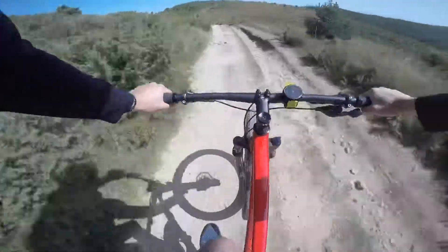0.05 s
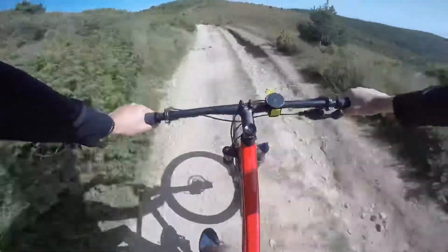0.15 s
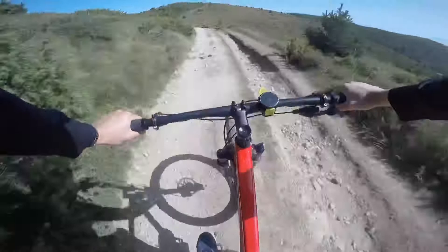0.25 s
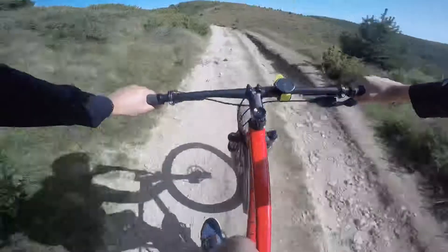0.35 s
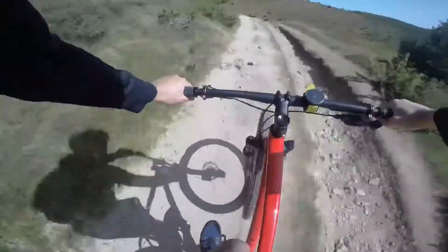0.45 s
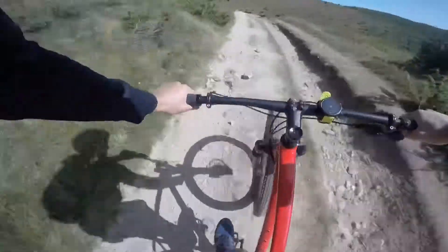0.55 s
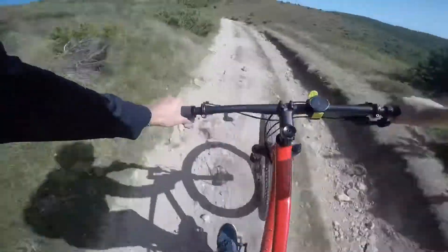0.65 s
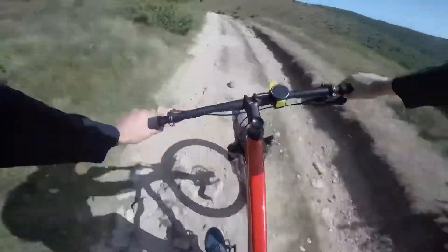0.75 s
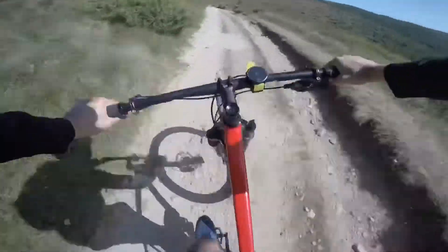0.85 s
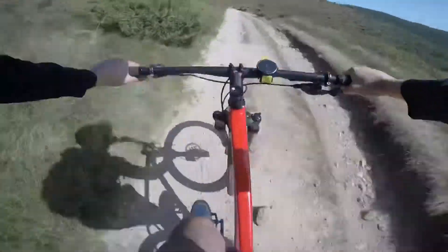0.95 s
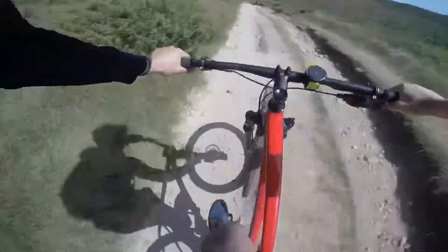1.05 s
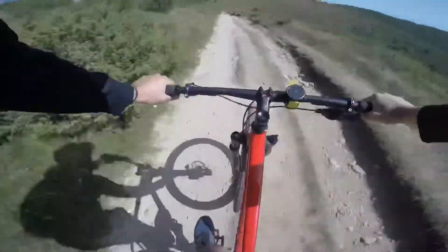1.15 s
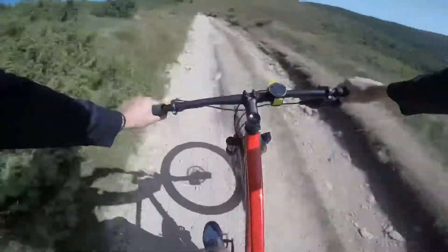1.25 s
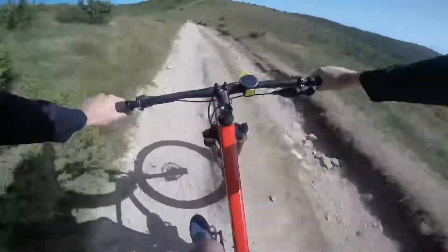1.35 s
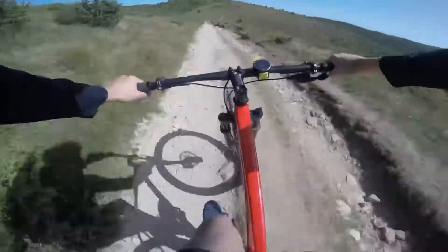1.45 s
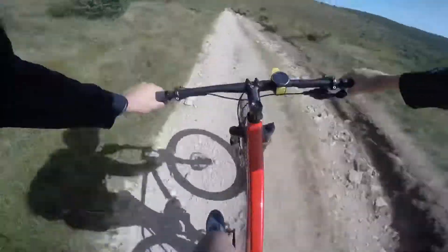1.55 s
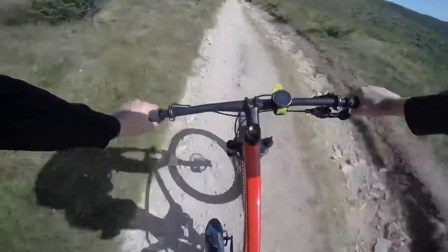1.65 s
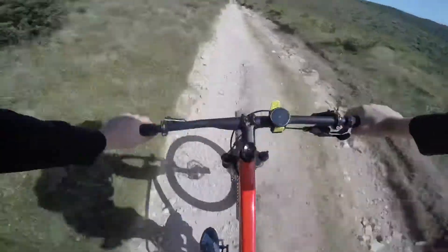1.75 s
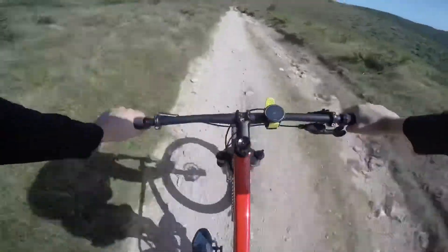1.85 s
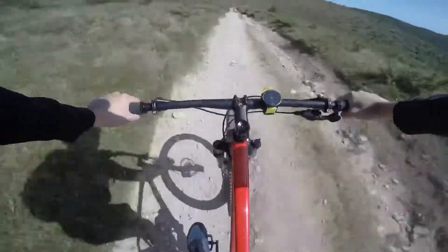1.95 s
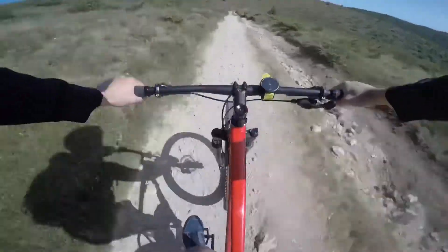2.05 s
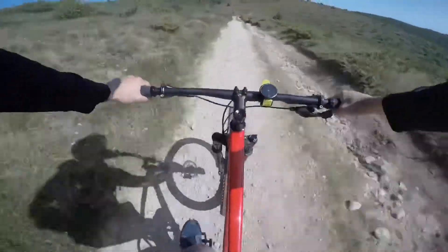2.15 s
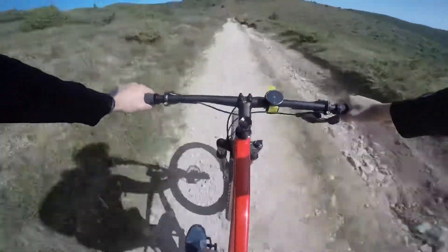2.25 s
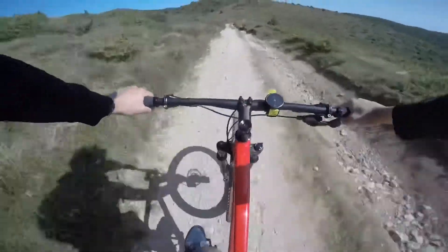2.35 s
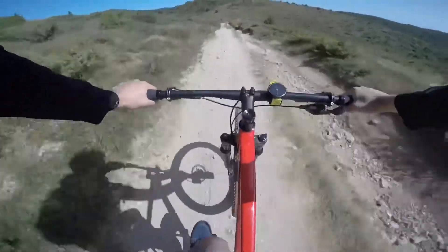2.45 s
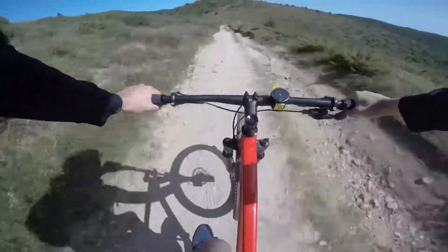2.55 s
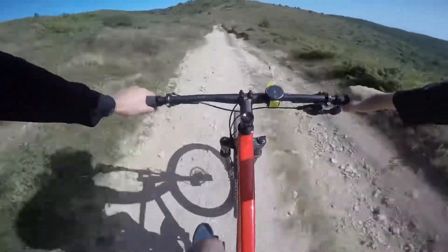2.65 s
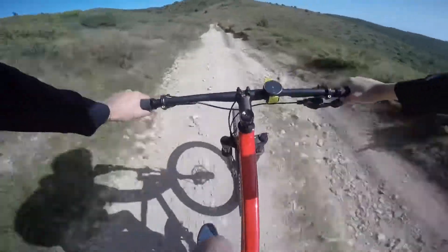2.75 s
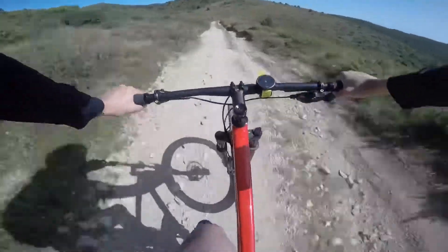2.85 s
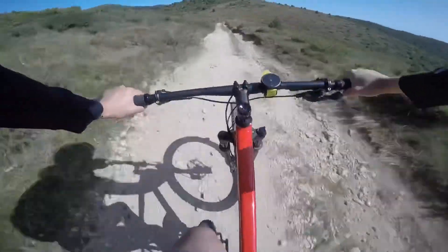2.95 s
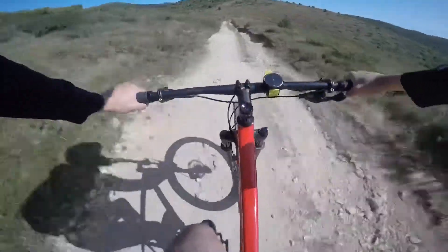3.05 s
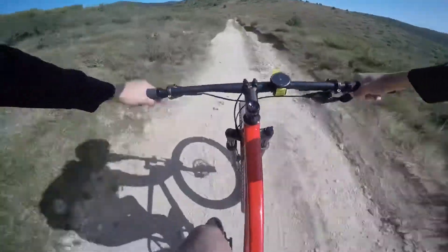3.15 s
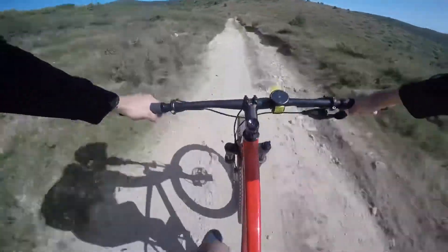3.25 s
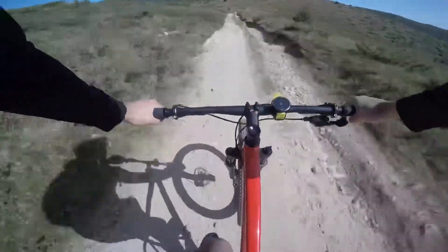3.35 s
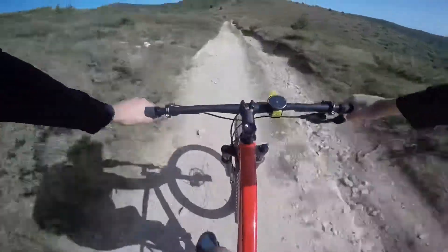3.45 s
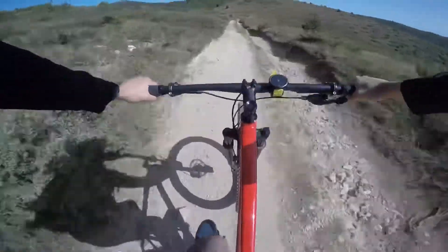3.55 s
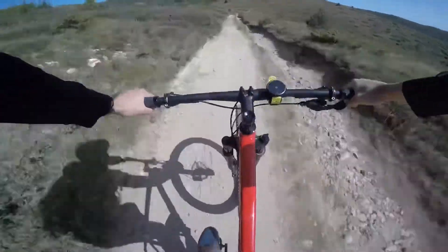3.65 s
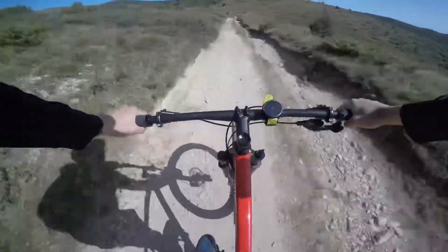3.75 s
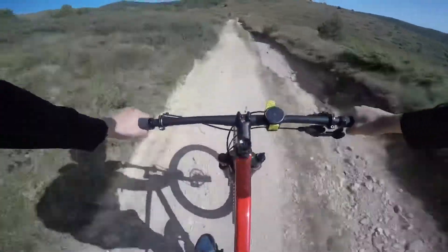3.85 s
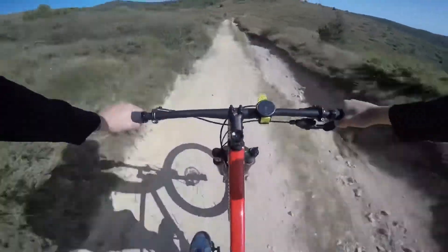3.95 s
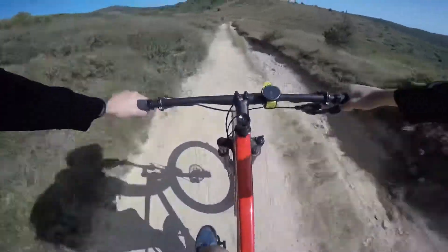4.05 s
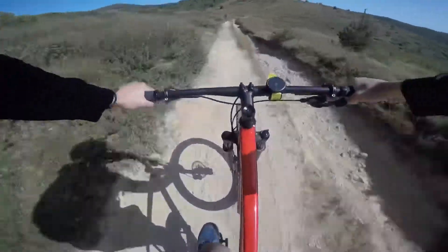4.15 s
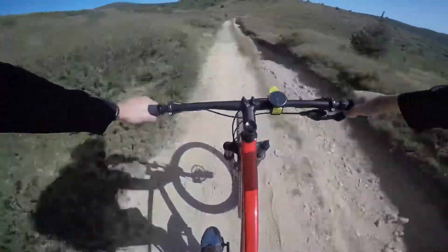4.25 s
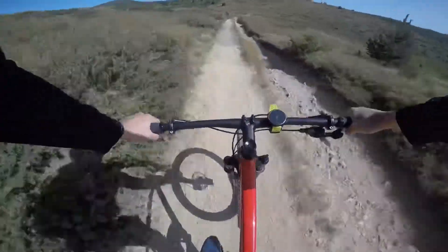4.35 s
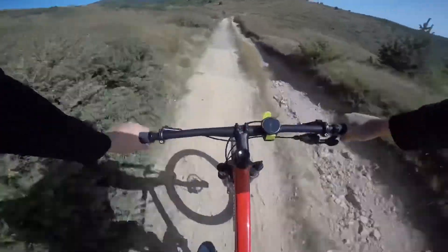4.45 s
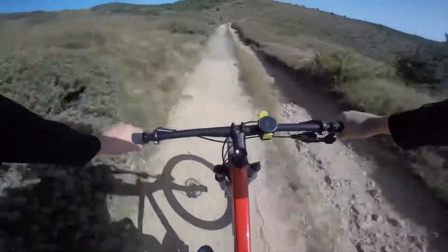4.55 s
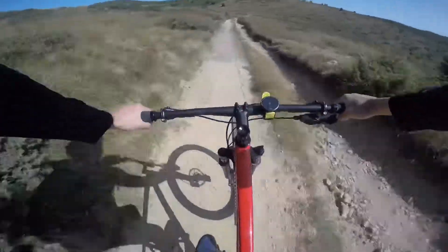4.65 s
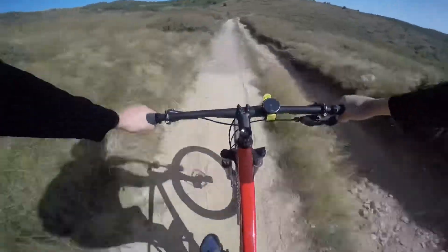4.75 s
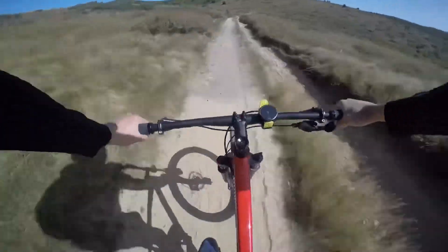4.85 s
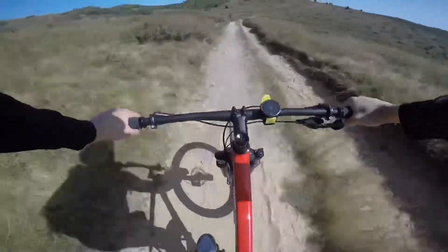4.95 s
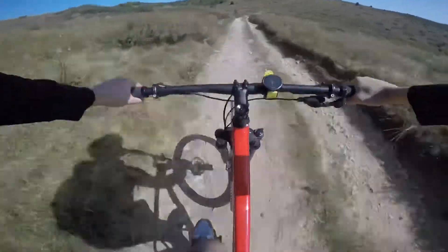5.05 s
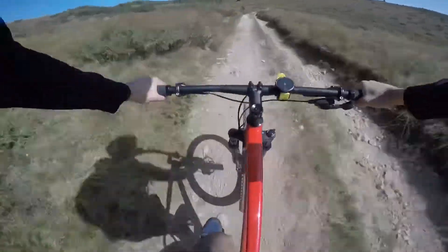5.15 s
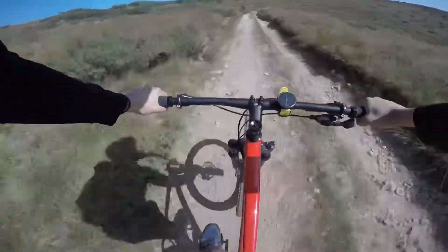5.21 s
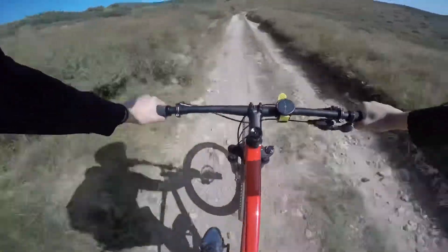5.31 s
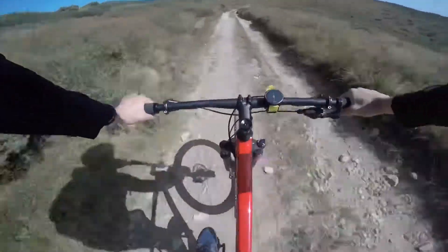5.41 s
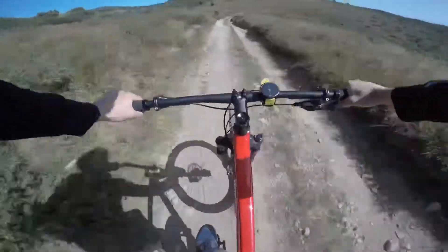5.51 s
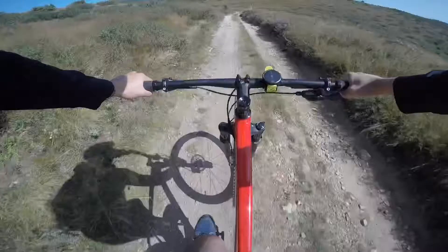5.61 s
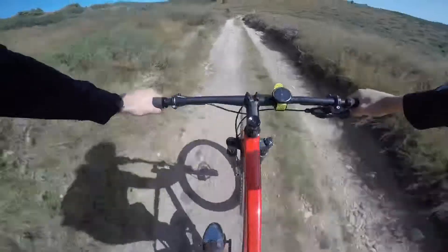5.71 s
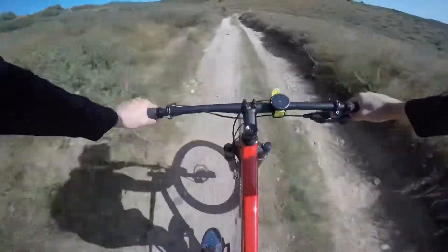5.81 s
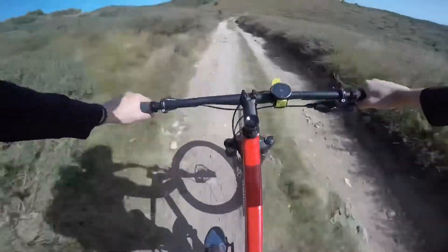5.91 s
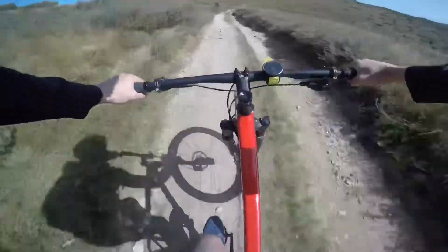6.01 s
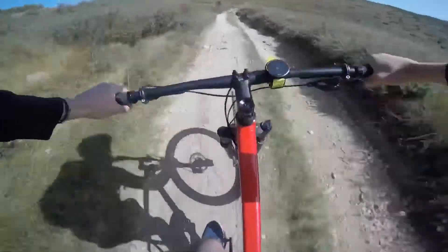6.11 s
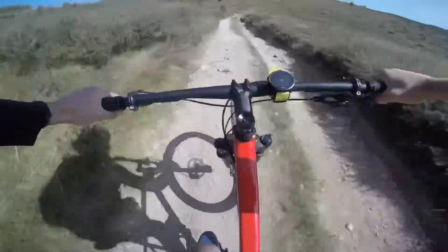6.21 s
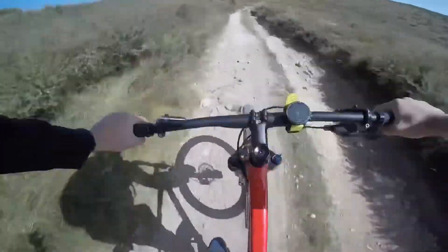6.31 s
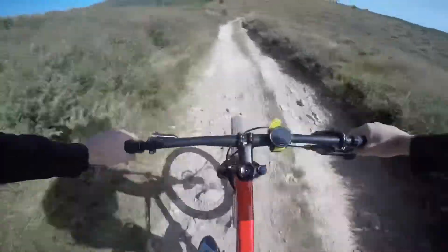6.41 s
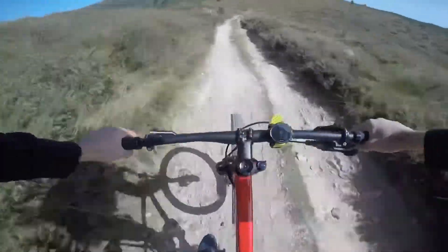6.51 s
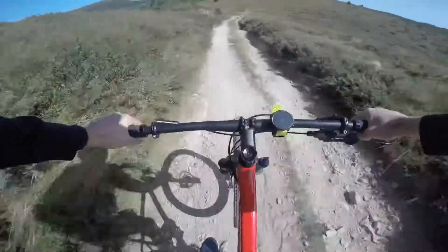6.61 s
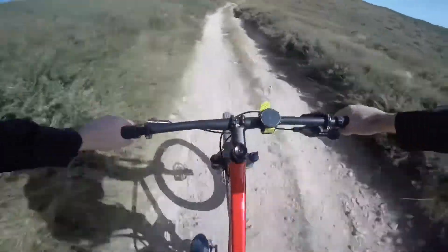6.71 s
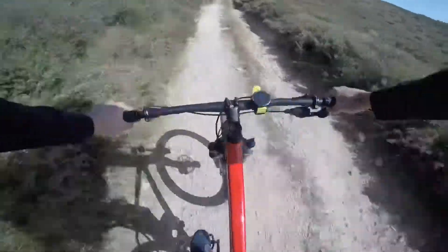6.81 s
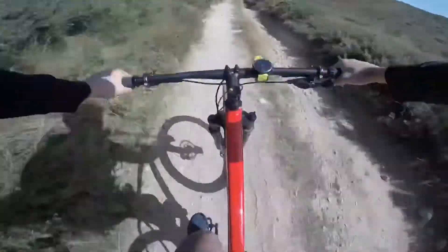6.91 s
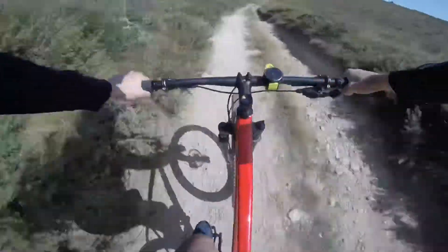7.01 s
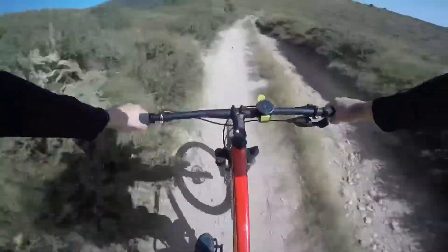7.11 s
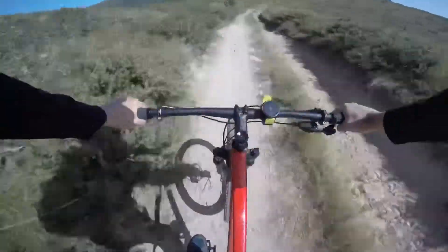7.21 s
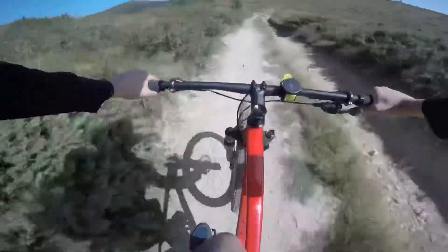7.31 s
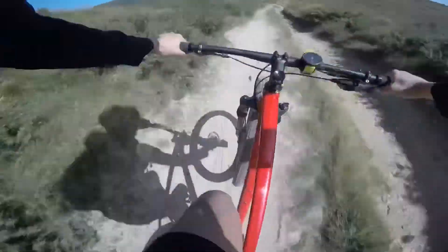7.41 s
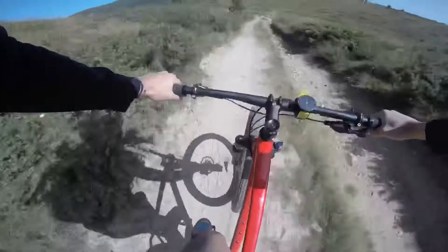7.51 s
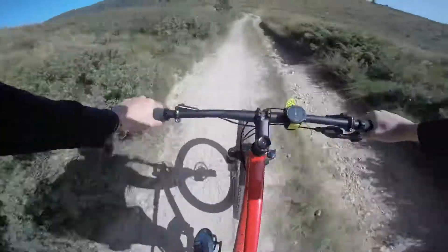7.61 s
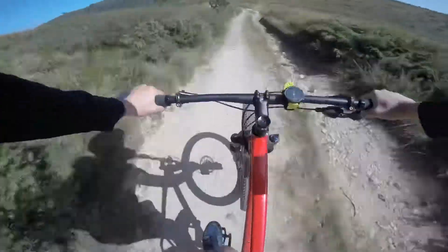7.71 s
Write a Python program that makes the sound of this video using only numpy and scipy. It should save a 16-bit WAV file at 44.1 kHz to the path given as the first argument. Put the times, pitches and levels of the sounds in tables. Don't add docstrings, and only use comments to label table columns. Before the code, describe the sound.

A mountain bike rolls down an open gravel track, heard very close through a cased chest camera. Tyres crunch and scrape continuously while wind throbs, rushes and pounds the microphone. From 0.4 to 1 s the case lurches in deep, overloaded thuds; around 0.73 s a stone rings a spoke brightly, followed at once by a hard frame slap. From 1.2 to 1.9 s pebbles snap thickly and crunching swells, with a fork thump near 1.6 s. From 2 to 4.7 s it is somewhat calmer, with scattered rattles, clicks and softer gusts. Grit thickens around 4.8-5 s, and a rut thuds at 5.5 s. A huge wind-like jolt hits about 6.25 s amid heavy crunching. Rattles return at 6.9 s, then a dense clatter of stones, slaps and a thump at 7.4 s before rolling on. Faint hiss and high electronic whine sit underneath, the treble fluttering.

```python
import sys
import numpy as np
from scipy import signal
from scipy.fft import rfft, irfft, next_fast_len
from scipy.io import wavfile
from scipy.ndimage import uniform_filter1d, map_coordinates

SR = 44100
rng = np.random.default_rng(int(sys.argv[2]) if len(sys.argv) > 2 else 0)


def field_ratio(decibels):
    return 10 ** (np.asarray(decibels, dtype=float) / 20)


def inscribe(sig):
    pcm = np.round(np.clip(np.atleast_2d(sig).T, -1, 1) * 32767)
    wavfile.write(sys.argv[1], SR, pcm.astype(np.int16))


N = 342657

# f/Hz, density/dB
CRUNCH_SPECTRUM = [(200, -50.5), (500, -11.5), (800, -10.5), (1400, -10), (2000, -6.5), (3000, -8),
                   (3700, -16.5), (5000, -32), (9000, -100)]
# f/Hz, density/dB
GRIT_SPECTRUM = [(2000, -99), (3500, 6), (4500, 5.5), (6000, 0.5), (8000, -4.5), (9000, -13.5),
                 (12500, -24), (15000, -32)]
FRAME_LOW_HZ, FRAME_HIGH_HZ = 1100, 2100


def unit(x):
    return x / np.sqrt(np.mean(x ** 2) + 1e-20)


def along(points, hz):
    f, v = np.transpose(points)
    return np.interp(np.log(hz + 1), np.log(f + 1), v)


def curve(rows):
    s, value = np.transpose(rows)
    return np.interp(np.arange(N) / SR, s, value)


def wobble(rate_hz):
    knots = rng.standard_normal(int(N * rate_hz / SR) + 4)
    return map_coordinates(knots, [np.arange(N) * rate_hz / SR])


def coloured(x, level_db):
    m = 2 * next_fast_len(N // 2 + SR // 4)
    gain = field_ratio(level_db(np.fft.rfftfreq(m, 1 / SR)))
    cepstrum = irfft(np.log(gain + 1e-6), m)
    cepstrum[1:m // 2] *= 2
    cepstrum[m // 2 + 1:] = 0
    return irfft(rfft(x, m) * np.exp(rfft(cepstrum)), m)[:N]


def noise(level_db):
    return coloured(rng.standard_normal(N), level_db)


def steady(x, seconds):
    power = np.abs(uniform_filter1d(x ** 2, size=round(seconds * SR)))
    return unit(x / np.sqrt(power + .1 * np.mean(x ** 2)))


def swells(rows, edge):
    t = np.arange(-SR // 4, SR // 4) / SR
    power = np.zeros(N + SR)
    for s, db, length_s in rows:
        bell = np.exp(-2.8 * np.abs(t / min(length_s, .15)) ** edge)
        power[round(s * SR) + SR // 4:][:len(t)] += field_ratio(2 * db) * bell
    return power[SR // 2:][:N]


def case_db(hz):
    # f/Hz, width/Hz, lift/dB
    modes = [(1090, 470, 11), (2620, 620, 4.5), (3386, 120, 4), (4130, 230, 4.5), (4990, 530, 5.5),
             (6900, 150, 1.5), (7770, 150, 4.5), (9760, 280, 12), (12000, 870, 15.5)]
    return sum(db / (1 + (2 * (hz - centre) / width) ** 2) for centre, width, db in modes)


def crunch_db(hz):
    return along(CRUNCH_SPECTRUM, hz) + case_db(hz)


def bright_grit_db(hz):
    return along(GRIT_SPECTRUM, hz) + case_db(hz)


def electronics():
    # f/Hz, density/dB
    hiss_spectrum = [(2350, -23), (4000, -10.5), (6230, -3.5), (7410, -2), (7880, -4.5), (8570, -9),
                     (12200, -9), (15300, -12)]
    # f/Hz, rms level/dB
    whine_lines = [(6293.5, -75), (6324, -76), (12617.5, -82)]

    def hiss_db(hz):
        skirt_db = 6 / (1 + ((hz - 6310) / 80) ** 2) + 5 / (1 + ((hz - 12617) / 70) ** 2)
        return along(hiss_spectrum, hz) + skirt_db

    t = np.arange(N) / SR
    out = field_ratio(-66.0) * unit(noise(hiss_db))
    sing_hz, sing_width_hz = 7770, 60
    sing = unit(noise(lambda hz: -20 * np.log10(1 + ((hz - sing_hz) / sing_width_hz) ** 2)))
    out += field_ratio(-81.5 + 6 * wobble(8.2)) * sing
    for hz, db in whine_lines:
        out += np.sqrt(2) * field_ratio(db + 0.48 * wobble(7.3)) * np.sin(2 * np.pi * hz * t)
    return out


def jolts():
    # t/s, peak level/dB, t60/s, direction (+1 or -1), first f/Hz
    lurches = [(0.418, -13, .22, -1, 46.5), (0.564, -13.5, 0.52, -1, 44.5), (.778, -11, 0.28, 1, 21.5),
               (0.854, -4.5, 0.31, 1, 16.6), (.963, -10, 0.24, 1, 18), (1.347, -16.5, 0.31, -1, 62),
               (5.9, -18, 0.33, 1, 20), (6.153, -20, 0.83, 1, 10.2), (6.261, -3, 0.21, 1, 22),
               (6.336, -11, 0.52, 1, 21.3), (6.792, -17, 0.32, -1, 55), (7.377, -17, 0.22, -1, 50)]
    sway_hz, sag_s, rise_s = 22.27, 0.026, 0.0045
    t = np.arange(SR // 2) / SR
    out = np.zeros(N + len(t))
    for s, db, t60_s, direction, start_hz in lurches:
        turns = sway_hz * t + (start_hz - sway_hz) * sag_s * (1 - np.exp(-t / sag_s))
        fade = field_ratio(db - 60 * t / t60_s) * (1 - np.exp(-t / rise_s))
        out[round(s * SR):][:len(t)] += direction * fade * np.sin(2 * np.pi * turns)
    return out[:N]


def wind(swell):
    # t/s, strength/dB
    headwind = [(0, -33), (.3, -32), (.7, -30.5), (1.02, -26.5), (1.27, -32.5), (1.6, -25), (2.3, -34.5),
                (2.7, -35), (3.0, -28), (3.33, -36.5), (4.05, -43), (4.48, -44), (4.9, -26), (5.1, -33.5),
                (5.6, -32.5), (6.1, -30.5), (6.7, -31.5), (7.77, -33)]
    # centre/s, peak level/dB, length/s, tightness/dB
    eddy_slaps = [(0.127, -38, 0.045, 9.5), (0.235, -28.5, 0.073, -10), (0.417, -23, 0.059, -2),
                  (0.609, -19, 0.055, -8), (0.93, -35, 0.069, -2), (1.133, -20, 0.026, -4),
                  (1.325, -28, 0.024, 10), (1.475, -25.5, 0.072, 5), (2.415, -25, 0.051, -9),
                  (2.86, -43, .05, 8), (3.49, -29.5, 0.14, -13), (3.792, -33.5, 0.071, 11),
                  (4.13, -33, 0.039, 9), (4.467, -47, 0.16, 18), (4.654, -32.5, 0.17, -14),
                  (5.178, -25.5, 0.046, -15), (5.384, -21, 0.026, 5), (5.68, -33, 0.033, 8),
                  (5.923, -28, 0.093, 0), (6.284, -30, 0.017, 14), (6.385, -29.5, 0.048, 15),
                  (6.583, -22, 0.029, -20), (6.75, -28, 0.023, 0), (6.815, -28.5, 0.057, 11),
                  (6.926, -26, 0.1, -6), (7.12, -25.5, 0.027, -11), (7.232, -22, 0.025, -13),
                  (7.39, -23, 0.037, 14), (7.732, -22.5, 0.028, 16.5)]
    # t/s, rush level/dB
    stream = [(0.0, -55.5), (0.82, -53.5), (0.95, -53), (1.4, -50.5), (1.67, -54), (2.81, -55), (3.7, -51),
              (4.05, -54), (4.67, -54), (4.93, -50), (6.3, -51), (6.51, -53), (7.51, -49.5), (7.77, -50)]
    # f/Hz, density/dB
    buffet_spectrum = [(2, -30.5), (5, -9), (20, 0), (30, -6.5), (42, -20.5), (70, -39.5), (300, -120)]
    # f/Hz, density/dB
    throb_spectrum = [(20, -52.5), (40, 6.5), (60, -3), (85, -6), (130, -55), (400, -120)]
    # f/Hz, density/dB
    rush_spectrum = [(50, -39.5), (90, -0.5), (125, -5), (160, -8), (220, -16), (350, -18), (500, -27.5),
                     (800, -30), (2000, -57)]
    calm_db, gust_edge = -30, 4.6

    steady_power = field_ratio(2 * curve(headwind))
    slaps = swells([(s, db, length_s) for s, db, length_s, _ in eddy_slaps], gust_edge)
    tight = swells([(s, db + tight_db, length_s) for s, db, length_s, tight_db in eddy_slaps], gust_edge)
    buffet_db = 10 * np.log10(steady_power + slaps)
    tight_db = 10 * np.log10(steady_power + tight)

    buffet = steady(noise(lambda hz: along(buffet_spectrum, hz)), seconds=0.104)
    pressure = field_ratio(buffet_db + 1.5) * buffet + jolts()
    clipped = 0.44 * np.tanh(pressure / 0.39)

    throb_db = -38.5 + 0.53 * (tight_db - calm_db) + 3.0 * wobble(7.0)
    throb = field_ratio(throb_db) * steady(noise(lambda hz: along(throb_spectrum, hz)), seconds=0.16)

    rush_db = curve(stream) + 7.5 + 0.11 * (buffet_db - calm_db)
    eddies = field_ratio(1.04 * wobble(25) + 2.03 * wobble(70)) * rng.standard_normal(N)
    rush = steady(coloured(eddies, lambda hz: along(rush_spectrum, hz)), seconds=0.16)
    return clipped + throb + field_ratio(rush_db) * swell ** 0.14 * rush


def bumps():
    # t/s, peak level/dB, f/Hz, t60/s
    ruts = [(0.249, -26, 108, 0.071), (0.364, -49, 156, 0.049), (0.583, -31, 122, 0.066),
            (0.701, -25.5, 144, 0.078), (0.75, -27, 110, 0.085), (1.096, -34, 110, 0.045),
            (1.236, -21, 170, 0.05), (1.572, -17, 117, 0.022), (2.116, -37, 136, 0.14),
            (2.438, -33, 123, 0.16), (2.715, -27, 110, 0.062), (3.543, -30, 148, 0.094),
            (5.502, -15, 112, 0.021), (6.097, -30.5, 148, 0.11), (6.183, -31.5, 160, 0.077),
            (6.258, -24.5, 125, 0.087), (.845, -23, 116, .05), (6.683, -44, 110, 0.054),
            (6.797, -29.5, 135, 0.14), (7.303, -43, 145, 0.055), (7.392, -12, 151, 0.031),
            (7.564, -17.5, 119.6, 0.015)]
    t = np.arange(SR // 4) / SR
    out = np.zeros(N + len(t))
    for s, db, hz, t60_s in ruts:
        fade = field_ratio(db + 8.0 - 60 * t / t60_s) * (1 - np.exp(-t / 0.01))
        out[round(s * SR):][:len(t)] += fade * np.sin(2 * np.pi * hz * t * (1 - 5.4 * t))
    return out[:N]


def ring_down(rows):
    t = np.arange(SR // 16) / SR
    out = np.zeros(N + len(t))
    for s, db, hz, t60_s in rows:
        out[round(s * SR):][:len(t)] += field_ratio(db - 60 * t / t60_s) * np.sin(2 * np.pi * hz * t)
    return out[:N]


def frame_hits(hits):
    contact_s, rise_s, low_rise_s, snap_s = .0004, .0003, 0.0019, .0005
    t = np.arange(SR // 16) / SR
    rise = 1 - np.exp(-(t / rise_s) ** 2)
    low_rise = 1 - np.exp(-t / low_rise_s)
    squeeze = t / snap_s * np.exp(1 - t / snap_s)
    ring, dull, bright = np.zeros((3, N + len(t)))
    for s, db, low_hz, low_db, high_hz, bright_db in hits:
        at = round((s + contact_s) * SR)
        span = slice(at, at + len(t))
        crack = rng.standard_normal((2, len(t))) * rise * field_ratio(-60 * t / 0.0095)
        deep = min(field_ratio(2 * low_db), 1)
        snap_hz = 1.1 * low_hz ** deep * high_hz ** (1 - deep)
        high_power = max(1 - field_ratio(2 * low_db) - field_ratio(2 * bright_db), .02)
        high_db = 10 * np.log10(high_power)
        ring[span] += field_ratio(db + low_db + 5 - 60 * t / 0.012) * low_rise * np.sin(2 * np.pi * low_hz * t)
        ring[span] += field_ratio(db + high_db + 1.5 - 60 * t / 0.008) * rise * np.sin(2 * np.pi * high_hz * t)
        ring[span] += field_ratio(db - 2) * squeeze * np.sin(2 * np.pi * snap_hz * t)
        dull[span] += field_ratio(db + 7.5) * crack[0]
        bright[span] += field_ratio(db + bright_db + 10.0) * crack[1]
    return ring[:N] + coloured(dull[:N], crunch_db) + coloured(bright[:N], bright_grit_db)


def lens_grit():
    # t/s, peak level/dB, f/Hz
    glints = [(0.6759, -52, 8020), (0.6998, -44, 7080), (0.8584, -42, 7140), (1.92, -56, 7320),
              (1.9574, -50, 7280), (4.0193, -48, 7200), (4.5291, -46, 7010), (5.1178, -51, 7750),
              (5.3487, -47, 7010), (5.8032, -52, 7910), (6.0821, -51, 7770), (6.3165, -49, 7320),
              (6.4981, -50, 7610), (6.7042, -54, 7100), (6.799, -40, 7620), (7.212, -47, 7050),
              (7.3956, -49, 7990), (7.407, -42, 8000), (7.4214, -53, 7600), (7.446, -52, 8100)]
    return ring_down([(s, db, hz, 0.0068) for s, db, hz in glints])


def rattles():
    # t/s, peak level/dB, low f/Hz, low share/dB
    slaps = [(0.253, -37, 1140, 1), (.461, -46, 1200, -5), (0.7474, -17.5, 1144, 1),
             (1.966, -30, 1180, -1.5), (2.104, -41, 1210, 3), (2.43, -32, 1020, -3),
             (2.441, -28, 1030, -2.5), (2.84, -34, 880, -2), (2.965, -40, 890, -0.5), (3.119, -44, 980, 1),
             (3.189, -31.5, 930, -16), (3.245, -30, 1170, -1), (3.285, -34.5, 1090, -3.5),
             (3.439, -29.5, 1000, -0.5), (3.4401, -35, 1400, -9), (3.547, -34.5, 960, 0),
             (4.693, -38, 1170, -1), (4.82, -40, 1100, -14), (4.907, -30.5, 1130, 3),
             (6.685, -33.5, 1130, -1), (6.864, -20, 1160, -4), (6.993, -24.5, 1010, -3.5),
             (7.304, -27.5, 1090, -0.5), (7.407, -27, 1110, 4), (7.446, -21.5, 1390, -1),
             (7.4478, -25, 1100, -1.5), (3.313, -40, 1040, 2), (3.578, -42, 1050, 0)]
    return frame_hits([(s, db, hz, low_db, FRAME_HIGH_HZ, -32) for s, db, hz, low_db in slaps])


def flung_stones():
    # t/s, peak level/dB, high f/Hz, bright share/dB
    tube_hits = [(.099, -39.5, 2750, -18), (.33, -36.5, 1720, -20), (0.49, -37.5, 2310, -32),
                 (0.842, -34.5, 2520, -7.5), (1.39, -33.5, 2200, -12), (1.41, -37, 2500, -18),
                 (1.428, -28, 1850, -28), (1.463, -37, 2270, -24), (1.587, -36, 2370, -15),
                 (1.678, -39, 2230, -26), (1.748, -30.5, 2530, -17), (3.081, -35.5, 2780, -32),
                 (3.308, -39, 2750, -34), (3.574, -35, 1760, -34), (3.8905, -26.5, 2310, -16),
                 (4.065, -42, 1580, -24), (4.368, -38, 2540, -25), (5.367, -37, 1660, -20),
                 (5.873, -33, 2270, -23), (6.186, -35.5, 2300, -14), (6.777, -36, 2620, -27),
                 (6.826, -33.5, 1870, -14), (6.883, -28, 1830, -22), (6.971, -35, 2040, -24),
                 (7.231, -39, 2710, -22), (7.396, -31, 2120, -28), (7.406, -19, 1930, -22.5),
                 (7.41, -25.5, 2620, -31), (7.398, -31, 2720, -30), (7.415, -32, 2300, -26),
                 (7.438, -37, 2500, -30), (4.821, -36, 2400, -26), (4.862, -40, 2100, -28),
                 (4.921, -34.5, 2330, -20), (6.857, -37, 2400, -22), (3.431, -45, 2000, -23),
                 (7.4207, -28, 2000, -34), (7.423, -38, 2500, -30), (7.443, -39, 2600, -28),
                 (7.402, -39, 2500, -30), (7.321, -32, 2300, -22), (7.335, -32, 2000, -22),
                 (7.349, -35, 2600, -22), (1.279, -34.5, 2390, -19), (1.34, -34, 2200, -20),
                 (.223, -45, 2700, -27), (7.434, -37, 1650, -32)]
    # t/s, peak level/dB, f/Hz
    rim_hits = [(0.253, -41, 369), (1.234, -34.5, 328), (2.078, -35, 367), (2.129, -41, 400),
                (2.837, -38, 292), (0.369, -37, 343), (0.634, -36.5, 324), (0.817, -32, 313),
                (5.87, -42, 242), (6.356, -36.5, 326), (6.684, -44, 342), (6.863, -35, 253),
                (7.65, -42, 323), (2.965, -45, 283), (3.118, -40, 716), (3.547, -34, 390), (.742, -41, 332),
                (2.441, -34, 360), (4.064, -51, 250), (7.395, -27.5, 303)]
    # t/s, peak level/dB, f/Hz, t60/s
    spoke_rings = [
        (.728, -30, 3440, .03),
        (.7312, -37, 3440, .04),
        (.7255, -38, 4500, .012),
        (.7272, -46, 4930, .015),
        (.7272, -46, 7110, .04),
        (.7272, -45, 7760, .03),
    ]
    low_share_db = -9
    hits = [(s, db, FRAME_LOW_HZ, low_share_db, hz, bright_db) for s, db, hz, bright_db in tube_hits]
    s, db, hz, _ = spoke_rings[2]
    hits.append((s, db + 2.0, FRAME_LOW_HZ, low_share_db, hz, -4.5))
    thuds = [(s, db - 2.5, hz, 0.045) for s, db, hz in rim_hits]
    return frame_hits(hits) + ring_down([*spoke_rings, *thuds])


def pebbles():
    # t/s, peak level/dB, f/Hz
    snaps = [(0.066, -35, 1130), (0.169, -34, 1080), (0.282, -40, 2170), (0.338, -29, 1190),
             (0.408, -32, 2000), (0.68, -33, 1170), (0.791, -34, 810), (0.886, -30, 964), (0.91, -28, 1200),
             (0.986, -30, 1100), (1.041, -31.5, 845), (1.097, -34, 2690), (1.225, -31, 1320),
             (1.259, -36, 1190), (1.268, -32, 2500), (1.286, -29, 880), (1.332, -26, 1200),
             (1.378, -25, 1850), (1.398, -23, 1130), (1.483, -28, 930), (1.527, -30.5, 1200),
             (1.566, -37, 2400), (1.616, -37, 2320), (1.785, -28, 1770), (1.825, -39, 2640),
             (1.878, -26, 2260), (2.309, -32, 1120), (2.817, -36.5, 2460), (2.881, -38, 802),
             (3.162, -41, 1120), (3.329, -30, 1070), (3.664, -29, 1030), (3.706, -30, 1020),
             (3.981, -35, 1120), (4.173, -35, 2640), (4.268, -39, 2720), (4.542, -34, 2240),
             (4.755, -42, 926), (4.803, -32, 990), (4.814, -31.5, 2300), (4.849, -29, 1980),
             (4.993, -30, 1020), (5.139, -29, 940), (5.198, -40, 1100), (5.43, -37, 1010),
             (5.706, -27, 1020), (5.917, -25.5, 1130), (5.984, -27, 1060), (6.06, -32, 864),
             (6.114, -30, 2380), (6.214, -35, 1190), (6.255, -31, 1050), (6.296, -35, 1160),
             (6.614, -41, 990), (6.84, -30, 1150), (7.093, -37, 2530), (7.562, -29, 2020),
             (7.619, -40, 1140), (7.646, -44, 1500), (7.727, -31, 2330)]
    hits = []
    for s, db, hz in snaps:
        if hz < 1500:
            low_hz, low_share_db, high_hz = hz, -4, FRAME_HIGH_HZ
        else:
            low_hz, low_share_db, high_hz = FRAME_LOW_HZ, -32, hz
        hits.append((s, db - 7, low_hz, low_share_db, high_hz, -21.5))
    return frame_hits(hits)


def tread():
    # t/s, level/dB
    gravel = [(0, -50), (.5, -52.5), (.8, -51), (1.43, -49.5), (1.6, -50), (1.82, -49.5), (2.7, -53.5),
              (3.4, -49), (3.94, -52.5), (4.75, -50), (4.98, -45.5), (5.76, -49), (5.93, -61),
              (6.12, -43.5), (6.45, -52), (6.68, -60.5), (6.82, -49), (7.77, -49)]
    # centre/s, crunch level/dB, length/s
    patches = [(.64, -49, 0.063), (.76, -45, 0.085), (.88, -42.5, 0.076), (1.113, -50.5, 0.045),
               (1.841, -41.5, 0.041), (1.958, -46.5, 0.077), (2.438, -48.5, 0.1), (2.768, -51, 0.17),
               (2.93, -51, 0.077), (3.23, -52, 0.062), (3.442, -42, 0.045), (3.58, -48.5, 0.047),
               (3.707, -49, 0.049), (3.974, -51.5, 0.064), (4.28, -49, 0.04), (4.37, -47, 0.015),
               (4.551, -45.5, 0.035), (4.812, -41.5, 0.028), (5.386, -52, 0.029), (5.804, -45, 0.034),
               (5.931, -42, 0.059), (6.365, -46, 0.021), (6.635, -51.5, 0.029), (6.765, -46.5, 0.12),
               (6.825, -43, 0.03), (6.872, -40.5, 0.05), (7.126, -46.5, 0.065), (7.333, -38, 0.053),
               (7.425, -35.5, 0.031), (7.568, -43.5, 0.034)]
    # centre/s, crunch level/dB
    lumps = [(0.171, -48), (0.346, -47.5), (.698, -43), (.841, -41.5), (.916, -45), (0.995, -42),
             (1.278, -40), (1.337, -41.5), (1.394, -35.5), (1.479, -40.5), (1.56, -50), (1.69, -43.5),
             (1.762, -41), (1.89, -42.5), (2.152, -47.5), (2.313, -50), (3.166, -52), (3.329, -47),
             (4.862, -45), (4.908, -40), (5.003, -46.5), (5.14, -57), (5.24, -54), (5.99, -45),
             (6.174, -39), (6.248, -41.5), (6.308, -42.5), (6.991, -41), (7.244, -41.5)]
    pressure_db = curve(gravel)
    crushed = swells([*patches, *((s, db, 0.022) for s, db in lumps)], edge=1.2)
    return pressure_db, np.sqrt(1 + crushed / field_ratio(2 * pressure_db))


def patchy(depth_db):
    z = signal.stft(rng.standard_normal(N + 512), nperseg=512)[2]
    field = uniform_filter1d(rng.standard_normal(z.shape), 6, 0)
    field = uniform_filter1d(field, 6, 1)
    return signal.istft(z * field_ratio(depth_db * unit(field)), nperseg=512)[1][:N]


def grains(per_second, spread_db):
    chance, size, sign = rng.random((3, N))
    strength = field_ratio(-spread_db * np.log(size + .03))
    return unit((chance < per_second / SR) * strength * np.sign(sign - .5))


def tyres(pressure_db, swell):
    def split_db(ratio):
        return -10 * np.log10(1 + ratio ** 6)

    split_hz = 1600
    shake = field_ratio(0.2 * wobble(30) + 1.63 * wobble(90))
    big = .85 * grains(per_second=700, spread_db=3.2) + unit(patchy(depth_db=1.5))
    middling = .8 * grains(per_second=1000, spread_db=3.4) + unit(patchy(depth_db=1.5))
    fine = 0.96 * grains(per_second=1500, spread_db=2.5) + unit(patchy(depth_db=2.2))
    low = coloured(unit(big) * shake, lambda hz: crunch_db(hz) + split_db(hz / split_hz))
    high = coloured(unit(middling) * shake, lambda hz: crunch_db(hz) + split_db(split_hz / (hz + 1)))
    grit = unit(coloured(fine * shake, bright_grit_db))
    grit_db = -61 + 0.94 * (pressure_db + 50)
    return field_ratio(pressure_db) * swell * unit(low + high) + field_ratio(grit_db) * swell ** 0.92 * grit


def scene():
    pressure_db, swell = tread()
    air = electronics() + wind(swell)
    frame = bumps() + lens_grit() + rattles() + flung_stones()
    return (air + frame + pebbles() + tyres(pressure_db, swell))[None]


def flutter(x, above_hz, depth_db, beat_db):
    hz, t, z = signal.stft(x, SR, nperseg=128)
    cells = rng.standard_normal((len(hz) // 3 + 1, len(t) // 6 + 1))
    cells = np.kron(cells, np.ones((3, 6)))[:len(hz), :len(t)]
    beat = .55 * np.cos(2 * np.pi * 44.2 * t) + np.cos(2 * np.pi * 83.8 * t)
    reach = np.clip(2 * (hz / above_hz - 1), 0, 1)[:, None]
    bass_power = np.abs(uniform_filter1d(np.abs(z[0, 0]) ** 2, size=70))
    loud = np.log(bass_power + 1e-9)
    grid = np.meshgrid(hz / 345, np.arange(len(t)) / 16, indexing='ij')
    chance = map_coordinates(rng.standard_normal((66, len(t) // 16 + 2)), grid, order=0)
    dropped = (chance + .8 * unit(loud - loud.mean()) > 1.6) & (hz > 12900)[:, None]
    gain_db = -14 * dropped + reach * (depth_db * cells + beat_db * beat)
    return signal.istft(z * field_ratio(gain_db), SR, nperseg=128)[1][..., :N]


def roll_off(x):
    return signal.sosfilt(signal.butter(12, 15410, fs=SR, output="sos"), x)


def record(dry):
    x = flutter(dry, above_hz=6500, depth_db=1.6, beat_db=2.4)
    top_hz = 15300
    x = irfft(rfft(x) * (np.fft.rfftfreq(N, 1 / SR) < top_hz), N)
    return roll_off(x)


dry = scene()
out = record(dry)
inscribe(out)
```